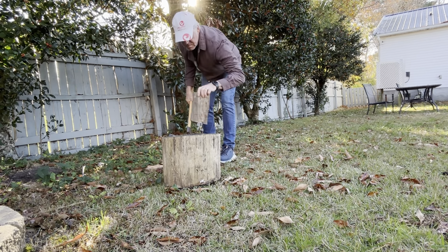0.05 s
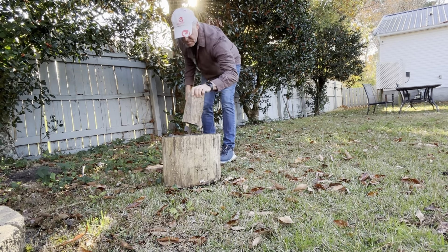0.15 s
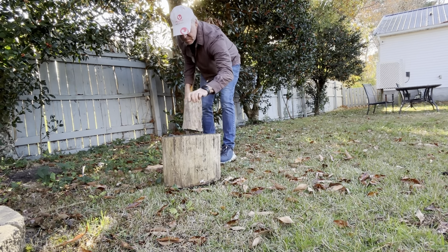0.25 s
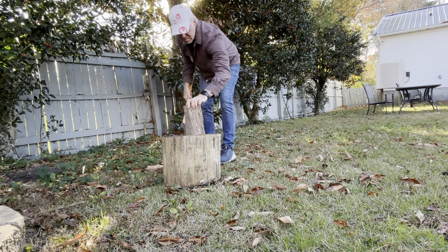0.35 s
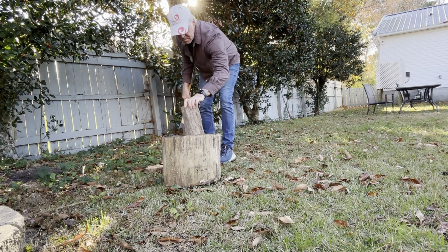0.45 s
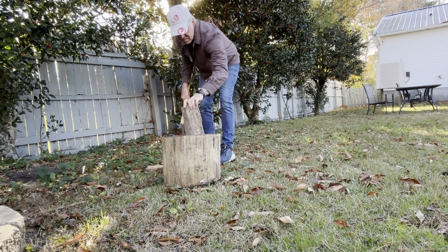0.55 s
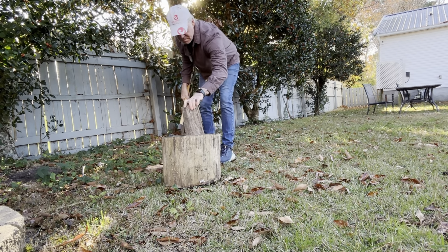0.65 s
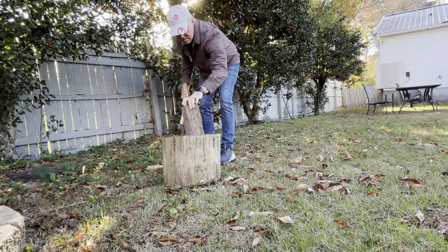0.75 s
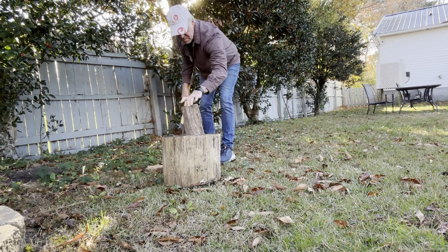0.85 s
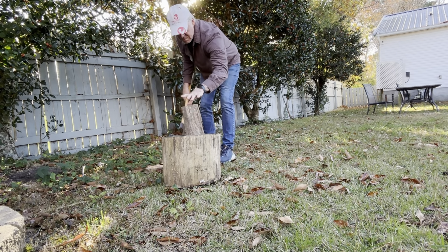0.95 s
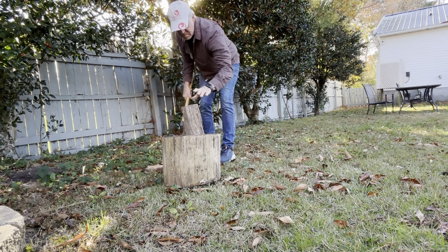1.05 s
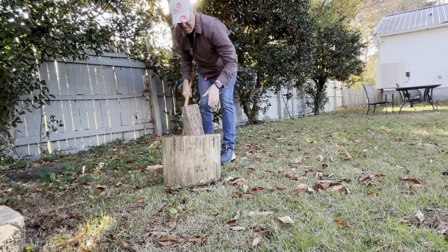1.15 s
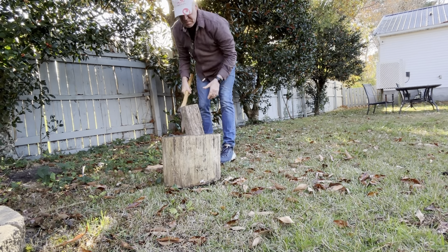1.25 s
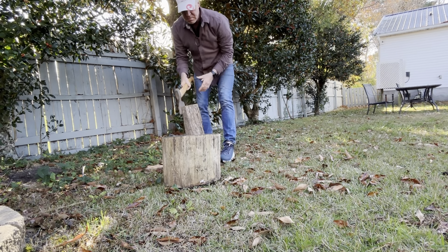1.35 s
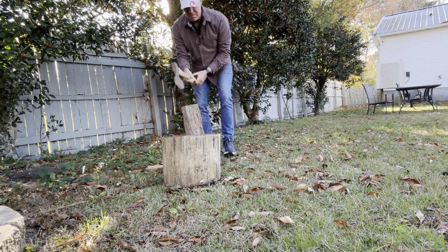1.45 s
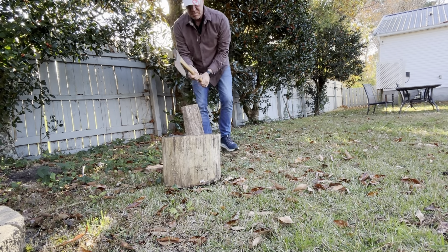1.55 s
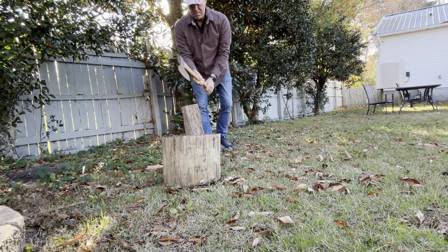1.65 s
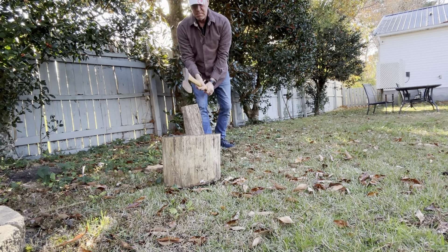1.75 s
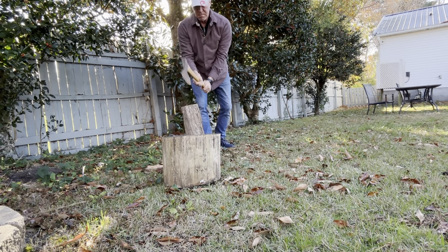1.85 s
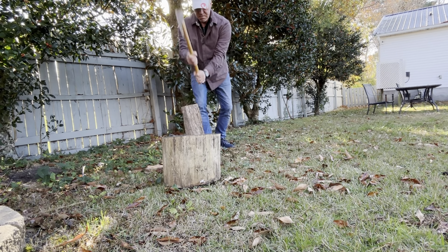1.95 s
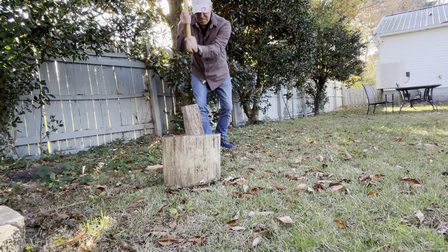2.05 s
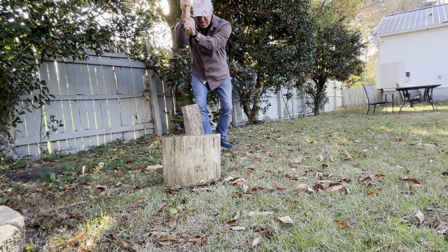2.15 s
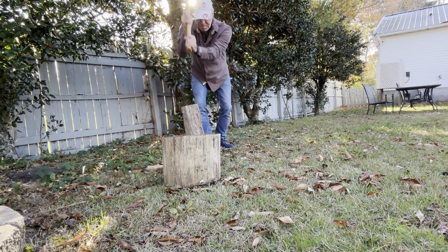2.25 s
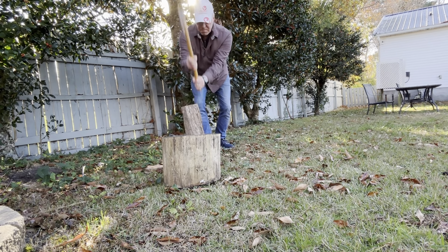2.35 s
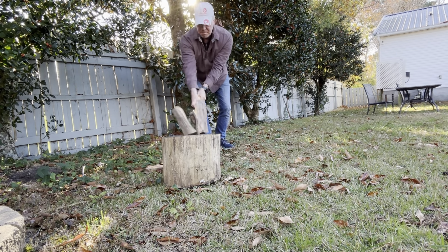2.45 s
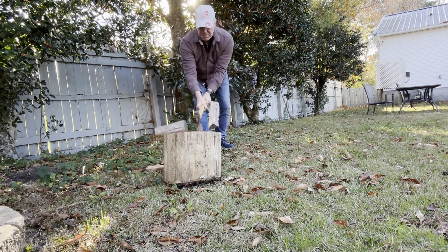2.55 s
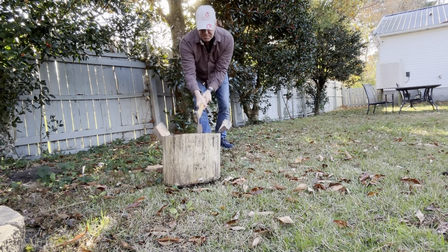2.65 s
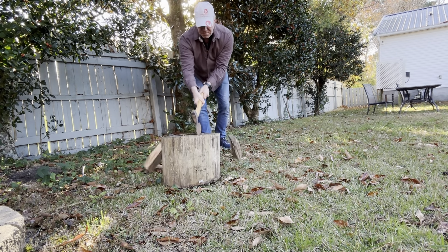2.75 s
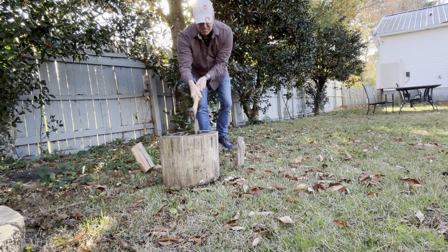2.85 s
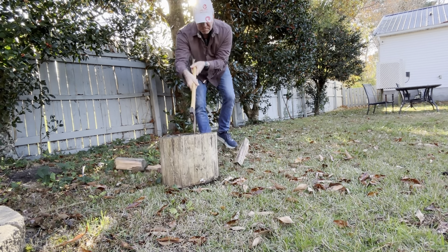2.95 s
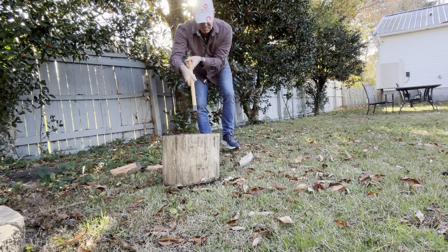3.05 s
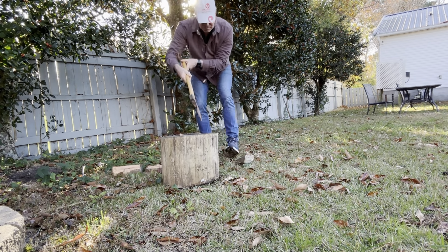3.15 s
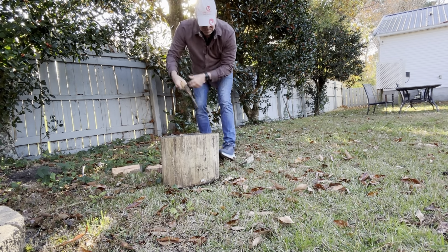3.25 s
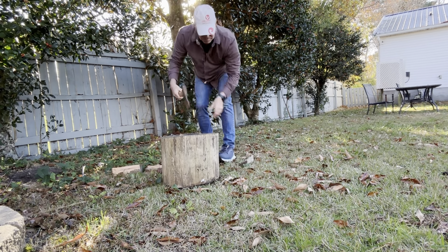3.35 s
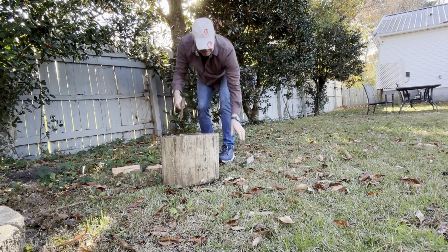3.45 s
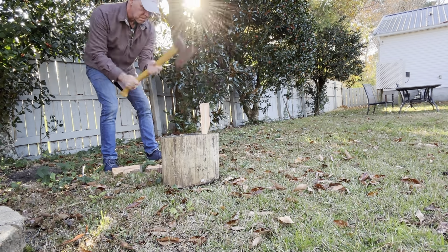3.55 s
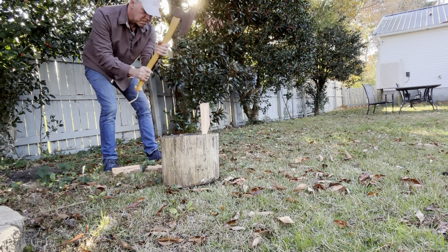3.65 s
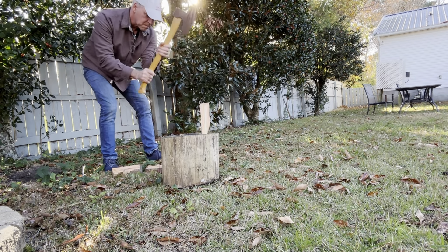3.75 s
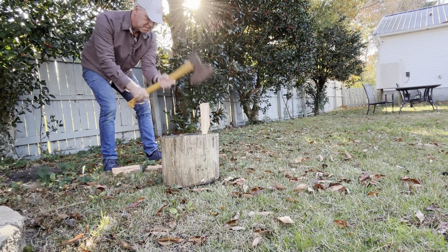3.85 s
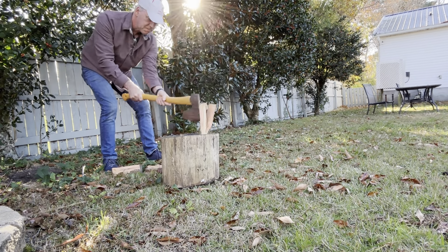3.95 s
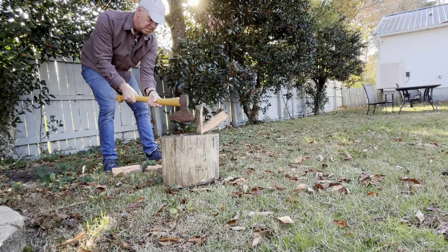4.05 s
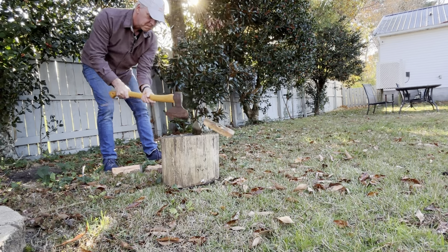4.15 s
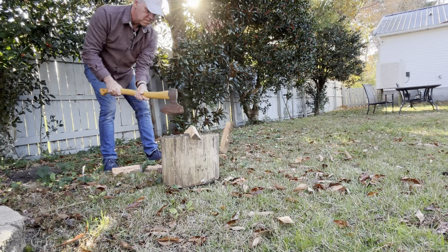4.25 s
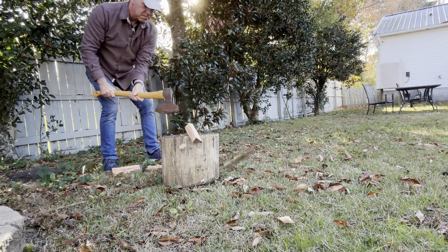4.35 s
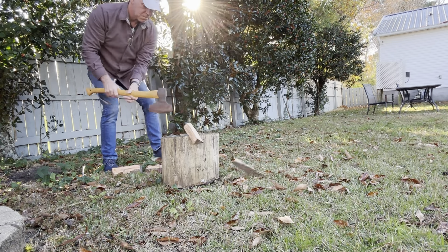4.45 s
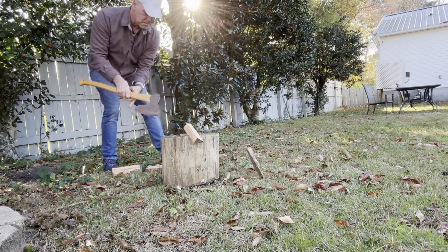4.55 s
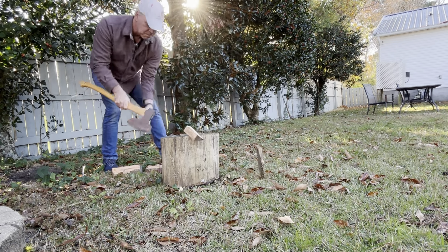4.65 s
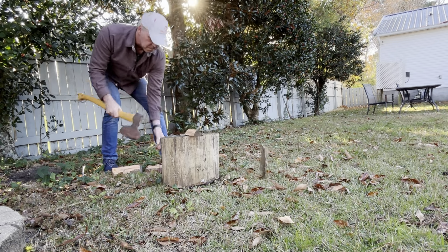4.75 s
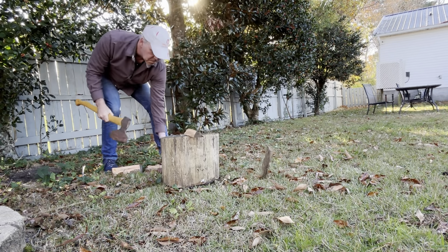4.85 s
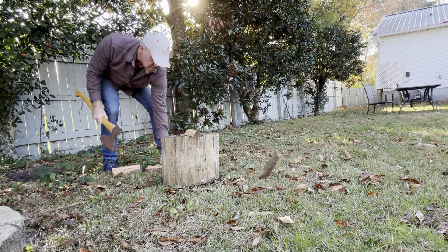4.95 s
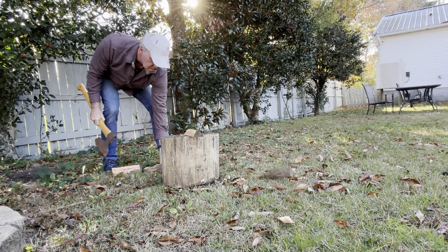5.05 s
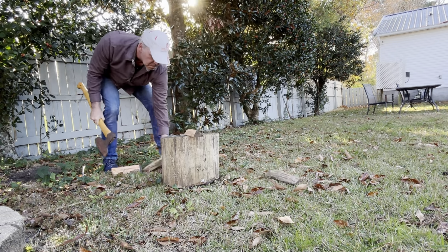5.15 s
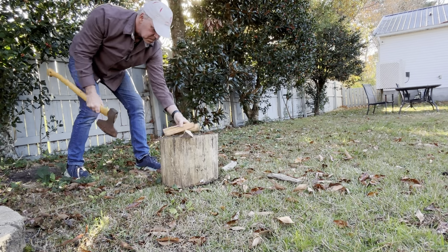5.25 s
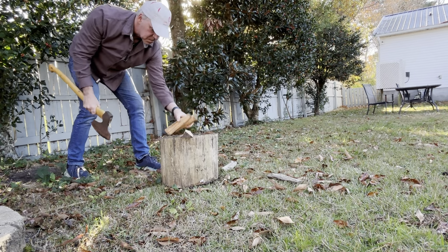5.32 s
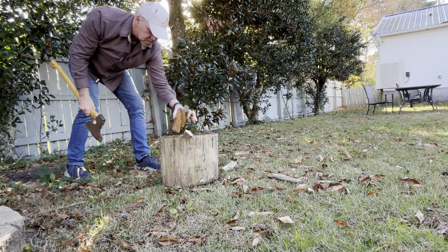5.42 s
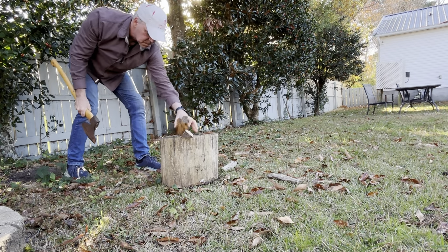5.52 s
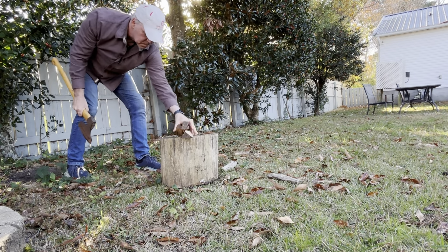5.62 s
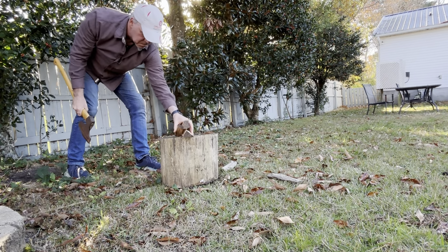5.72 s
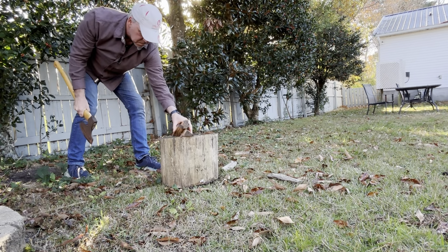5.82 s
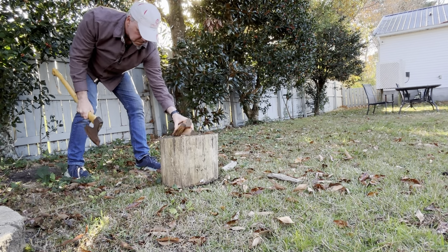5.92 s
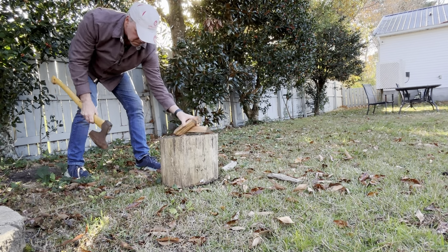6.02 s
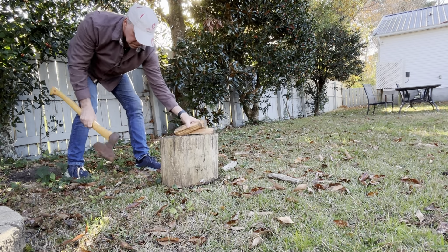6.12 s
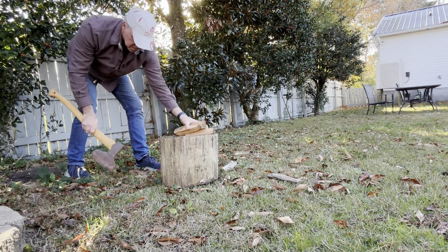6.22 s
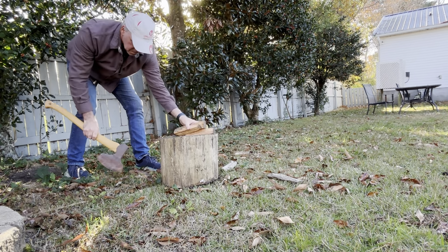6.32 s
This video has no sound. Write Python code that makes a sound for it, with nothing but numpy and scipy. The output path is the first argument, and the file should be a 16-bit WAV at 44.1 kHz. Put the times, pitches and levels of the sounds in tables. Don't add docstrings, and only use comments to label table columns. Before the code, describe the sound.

In a backyard, low traffic rumble, a distant engine and a steady hum lie under soft foot rustles in dry leaves. An axe splits a log with a loud crack and woody knocks, echoing off the fence; pieces drop into leaves. After a brief cut, a second sharp chop sends halves knocking and tumbling. Another cut leads to small, quiet wood knocks. Stereo small-camera microphone, blows fairly close.

```python
import sys
import numpy as np
from scipy import signal
from scipy.fft import rfft, irfft, next_fast_len
from scipy.io import wavfile
from scipy.ndimage import uniform_filter1d

SR = 44100
rng = np.random.default_rng(int(sys.argv[2]) if len(sys.argv) > 2 else 0)


def invert_db(level):
    return 10 ** (np.asarray(level, dtype=float) / 20)


def unload_audio(sound):
    columns = np.transpose(np.atleast_2d(sound))
    steps = np.round(np.clip(columns, -1, 1) * 32767)
    wavfile.write(sys.argv[1], SR, steps.astype(np.int16))


N = 281358


def read(points, hz, count=1):
    rows = np.transpose(points)
    return np.interp(np.log(hz + 1), np.log(rows[0] + 1), rows[count])


def evened(x):
    return x / np.sqrt(np.mean(x ** 2) + 1e-20)


def add(mix, s, sound):
    part = mix[..., round(s * SR):][..., :sound.shape[-1]]
    part += sound[..., :part.shape[-1]]


def coloured(x, gain_db):
    hz = np.fft.rfftfreq(x.shape[-1], 1 / SR)
    return irfft(rfft(x) * invert_db(gain_db(hz)), x.shape[-1])


def band_db(f, low_hz, high_hz, low_order, high_order):
    return -10 * np.log10((1 + (low_hz / (f + 1)) ** low_order) * (1 + (f / high_hz) ** high_order))


def envelope_db(t, s, hold, db, rise_db_s, fade_db_s):
    return db - rise_db_s * np.maximum(s - t, 0) - fade_db_s * np.maximum(t - s - hold, 0)


def field(level_db, size, patchy_db):
    frames, hz = 4 * N // size + 5, np.fft.rfftfreq(size, 1 / SR)
    t = np.arange(frames)[:, None] * size / 4 / SR
    re, im, patch = rng.standard_normal((3, 2, frames, len(hz)))
    patch = uniform_filter1d(patch[0], size=8, axis=0)
    patch = evened(uniform_filter1d(patch, size=8, axis=1))
    z = (re + 1j * im) * invert_db(level_db(t, hz) + patchy_db * patch)
    return signal.istft(z.transpose(0, 2, 1), nperseg=size, noverlap=3 * size // 4)[1][:, :N]


def burst(db, t60, gain_db, spiky_db=7.5):
    size = next_fast_len(int(np.clip(1.2 * t60 * SR, 1024, 8192)))
    t = np.arange(size) / SR
    spikes = invert_db(spiky_db * np.minimum(rng.exponential(1, 8192), 5))[:size]
    grit = coloured(rng.standard_normal((2, 8192))[:, :size] * spikes, gain_db)
    early = grit[:, :max(round(t60 * SR / 5), 64)]
    start = np.minimum(t / 0.00078, 1)
    end = np.minimum(3 * (1 - t / t[-1]), 1)
    return invert_db(db - 3 - 60 * t / t60) * start * end * grit / np.std(early)


def knock(out, s, db, first_hz, last_hz, t60, rattle_db, swings=0.76):
    t = np.arange(6000) / SR
    hz = last_hz + (first_hz - last_hz) * np.exp(-t / (.14 * t60))
    rise = (t / (t + swings / first_hz)) ** 2
    shape = rise * invert_db(-60 * (t / t60) ** 0.73)
    add(out[0], s, invert_db(db) * shape / shape.max() * np.sin(2 * np.pi * np.cumsum(hz) / SR))
    if rattle_db is not None:
        def around_pitch(f):
            return -9. * np.log2(f / first_hz + 0.014) ** 2
        add(out, s, burst(db + rattle_db, 1.35 * t60, around_pitch, spiky_db=2.0))


# start in seconds,
# peak in dB, t60 in seconds, tilt in dB per octave.
TEARS = [(2.4393, -3, 0.0052, 4.5), (2.44, -6, 0.0066, 4.5), (2.441, -20, 0.008, 4.5),
         (2.4435, -27, 0.014, 5), (2.4406, -20.5, 0.14, -2.5), (2.448, -42.5, .04, -10),
         (2.4562, -30, 0.059, 0), (2.475, -24, 0.015, -1), (2.46, -30, 0.26, -0.5), (2.492, -30, .03, -1.5),
         (2.5015, -31, 0.0076, 5), (2.519, -43, 0.065, -9), (2.549, -32, 0.017, -7.5),
         (2.575, -30.5, 0.037, -9), (3.8969, -21, 0.022, -1), (3.898, -10, 0.04, 5),
         (3.8996, -14, 0.039, 3.5), (3.9048, -19.5, .03, 0), (3.914, -28, 0.12, 3.5),
         (4.134, -38.5, 0.011, -14), (1.654, -49, 0.16, -3), (4.1962, -42, 0.019, 1.5),
         (5.523, -55, 0.021, 4), (5.532, -59, 0.059, 3), (5.557, -45, .015, 0), (5.566, -53, .05, -1.5),
         (5.927, -51, 0.06, 1), (6.245, -53, 0.02, 8)]
# frequency in Hz, density in dB per Hz.
TORN_WOOD = [(590, -23), (1000, -17.5), (1300, -8), (1640, -10.5), (2000, -10), (2590, -11), (3160, -14.5),
             (5810, -9.5), (6530, -11.5), (7090, -16), (8260, -16.5), (10300, -19), (12700, -25),
             (14700, -25), (16500, -42)]


def cracks():
    out = np.zeros((2, N))
    for s, db, t60, tilt_db in TEARS:
        add(out, s, burst(db, t60, lambda f: read(TORN_WOOD, f) + tilt_db * np.log2(f / 4000 + 0.0277)))
    return out


# start in seconds, peak in dB, first Hz, last Hz, t60 in seconds.
THICK_WOOD = [(2.4403, -9, 1280, 980, 0.0088), (2.4404, -5, 853, 294, 0.025),
              (2.4753, -11.5, 880, 400, 0.018), (2.478, -15.5, 330, 230, 0.022),
              (2.4838, -10.5, 320, 100.2, 0.038), (2.4907, -15, 104.5, 71, 0.031),
              (2.817, -28, 146, 112, 0.053), (3.899, -8.5, 880, 425, 0.014),
              (3.9046, -9.5, 498, 298, 0.023), (3.8995, -14.5, 820, 700, .02),
              (3.9035, -12, 420, 323, 0.035), (3.905, -22, 238, 174, 0.026), (4.136, -34, 570, 417, 0.023),
              (4.1956, -25, 595, 418, 0.019), (4.2045, -24.5, 332, 250, 0.007),
              (4.1166, -29, 550, 442, 0.018), (5.525, -37, 610, 296, 0.036),
              (5.553, -33.5, 304, 203, 0.026)]


def blows():
    out = np.zeros((2, N))
    for s, db, first_hz, last_hz, t60 in THICK_WOOD:
        knock(out, s, db, first_hz, last_hz, t60, rattle_db=-9)
    return out


# start in seconds, peak in dB, pitch in Hz, t60 in seconds.
SPLINTER_NOTES = [(2.4435, -29, 4250, .015), (2.454, -23, 5800, .02), (2.455, -24, 4000, .025),
                  (2.461, -26, 1934, 0.053), (2.463, -31, 2680, 0.035), (2.4405, -18.5, 2440, 0.011),
                  (2.441, -23.5, 3640, 0.017), (4.21, -52.5, 3580, 0.092), (2.4755, -32, 4310, 0.013),
                  (2.4755, -42, 1210, 0.02), (2.493, -36, 1990, .04), (2.497, -30, 4770, 0.094),
                  (2.522, -34, 1600, .025), (2.522, -35.5, 3670, 0.029), (2.539, -34, 1470, 0.026),
                  (2.559, -39, 1840, .04), (2.61, -48, 1810, 0.061), (2.635, -47, 3650, 0.057),
                  (2.44, -11, 5660, 0.009), (3.901, -16, 5220, .012), (3.9, -22.5, 2410, 0.01),
                  (3.907, -38, 4300, .03), (4.578, -47, 4600, .04), (3.903, -32, 1866, 0.014),
                  (3.9045, -24, 5900, 0.013), (3.905, -29, 3220, 0.029), (3.913, -28, 7250, 0.0296),
                  (3.918, -29, 5470, .015), (3.925, -36, 3250, .08), (3.951, -32, 2900, 0.0112),
                  (3.952, -42.5, 5000, .04), (3.939, -40.5, 1330, 0.017), (4.1155, -38, 1370, .03),
                  (4.1145, -32.5, 897, 0.011), (4.133, -47, 1390, .04), (4.2, -47, 1505, .06),
                  (4.4885, -46, 2480, 0.0086), (4.49, -45, 1210, 0.015), (5.5535, -46.5, 637, 0.021),
                  (5.564, -45, 980, 0.035), (5.563, -51, 1800, 0.031), (5.581, -40, 518, 0.023)]


def splinters():
    out = np.zeros((2, N))
    for s, db, hz, t60 in SPLINTER_NOTES:
        knock(out, s, db, hz, hz, t60, rattle_db=None)
    return out


# start in seconds, peak in dB, pitch in Hz, t60 in seconds.
STEEL_RINGS = [
    (3.8988, -12, 7060, 0.01),
    (3.8995, -11, 12900, 0.0048),
    (3.912, -39, 6000, .016),
    (4.4887, -42, 1870, 0.014),
    (5.5257, -50.5, 2280, 0.02),
    (5.531, -49, 2010, .018),
    (5.559, -52, 2380, 0.05),
    (5.924, -49, 1900, 0.087),
]


def rings():
    out = np.zeros((2, N))
    for s, db, hz, t60 in STEEL_RINGS:
        knock(out, s, db, hz, hz, t60, rattle_db=-6)
    return out


# start in
# seconds, peak in dB, lowest Hz, highest Hz.
SNAPS = [(1.41, -44, 4000, 7000), (1.7, -47, 4000, 7000), (1.602, -42, 4800, 6300), (1.61, -44, 4800, 6300),
         (1.662, -45, 2500, 7000), (1.685, -48, 1200, 3000), (2.4398, -10, 9000, 15500),
         (2.456, -27, 8000, 13950), (2.4915, -29, 1500, 6000), (2.502, -34, 3000, 9000),
         (2.7915, -42, 3000, 9000), (3.005, -40, 4000, 7000), (3.022, -42, 4000, 6500),
         (3.0735, -36, 4500, 9000), (3.8985, -10, 11000, 15500), (3.9045, -19, 10500, 15000),
         (3.951, -29, 2000, 9000), (3.956, -31, 2000, 8000), (4.0285, -41, 11000, 16000),
         (4.1158, -43, 10500, 16000), (4.1162, -49, 2500, 9500), (4.134, -49, 1200, 3300),
         (4.1966, -36, 2500, 6000), (4.2, -41, 9000, 15500), (4.2988, -43, 9000, 16000),
         (4.305, -45, 3000, 14000), (4.4105, -36, 4000, 9500), (4.415, -35, 5400, 8640),
         (4.4435, -43, 11500, 15500), (4.4886, -30, 1389, 5200), (4.4892, -41, 5500, 15000),
         (4.4915, -40, 1500, 5000), (4.501, -39, 6500, 15500), (4.5722, -29, 10700, 16400),
         (4.5745, -36, 11000, 16400), (5.5255, -42, 1800, 2900), (5.554, -41, 600, 2600),
         (5.566, -47, 3000, 4500), (5.926, -43, 3200, 4444), (6.12, -47, 3804, 5000)]


def ticks():
    out = np.zeros((2, N))
    for s, db, low_hz, high_hz in SNAPS:
        add(out, s, burst(db, .009, lambda f: band_db(f, low_hz, high_hz, 8, 8), spiky_db=0))
    return out


# start in seconds, peak in dB, first Hz, t60 in seconds.
LOOSE_PIECES = [
    (2.452, -24.5, 319, 0.13),
    (2.454, -32, 790, 0.061),
    (2.526, -41.5, 600, 0.062),
    (2.792, -47, 1010, 0.02),
    (4.122, -34.5, 468, 0.022),
    (4.21, -44, 700, 0.024),
    (4.2875, -35, 193, 0.027),
    (5.535, -36.5, 346, 0.019),
    (5.562, -45, 557, 0.03),
    (5.58, -50, 512, 0.019),
]


def clatters():
    out = np.zeros((2, N))
    for s, db, hz, t60 in LOOSE_PIECES:
        knock(out, s, db, hz, 0.72 * hz, t60, rattle_db=4)
    return out


# start in seconds, peak in dB, first Hz, t60 in seconds.
EDGE_TAPS = [
    (2.558, -35, 205, 0.084),
    (2.569, -33, 586, 0.017),
    (3.8995, -17, 1130, 0.02),
    (4.115, -36.5, 1910, 0.0091),
    (4.1153, -44.5, 1040, 0.009),
    (4.1966, -26.5, 1520, 0.014),
    (4.196, -23, 990, 0.0061),
    (5.572, -39, 514, 0.024),
    (5.92, -38.5, 356, 0.026),
]


def taps():
    out = np.zeros((2, N))
    for s, db, hz, t60 in EDGE_TAPS:
        knock(out, s, db, hz, .78 * hz, t60, rattle_db=-9.5)
    return out


# start in seconds, peak in dB, first Hz, last Hz, t60 in seconds.
HEAVY_ENDS = [
    (0.351, -36.5, 386, 297, 0.014),
    (2.573, -14, 313, 217, 0.023),
    (2.677, -31, 320, 255, 0.022),
    (2.801, -27.5, 517, 314, 0.021),
    (2.806, -33, 260, 200, 0.036),
    (4.2795, -31, 560, 456, 0.015),
]


def thuds():
    out = np.zeros((2, N))
    for s, db, first_hz, last_hz, t60 in HEAVY_ENDS:
        knock(out, s, db, first_hz, last_hz, t60, rattle_db=-15, swings=1)
    return out


def fence(struck):
    out = np.zeros((2, N))
    boards = rng.standard_normal(600) * np.exp(-np.arange(600) / (0.0051 * SR))
    smeared = signal.oaconvolve(struck, boards[None] / np.linalg.norm(boards), axes=1)[:, :N]
    echo = coloured(smeared, lambda f: band_db(f, 900, 9000, 4, 6) - f / 1200)
    add(out, .0525 - .0015, invert_db(-16) * echo)
    return out


# frequency in Hz, t60 in seconds.
YARD_T60 = [(200, 0.72), (600, 0.26), (1500, 0.79), (4000, 0.47), (8000, 0.48), (14000, 0.3)]
# frequency in Hz, gain in dB.
YARD_GAIN = [(200, -6.5), (600, -11.5), (1500, -7.5), (3000, 1.5), (4000, 3.5), (6000, -7), (9500, -3),
             (13000, -15.5), (16000, -14)]


def yard(x):
    hz, t, z = signal.stft(x, SR, nperseg=256, noverlap=192)
    power = uniform_filter1d(abs(z.T) ** 2, size=7, axis=1)
    keep = invert_db(-2 * 60 * 64 / SR / read(YARD_T60, hz))
    linger = np.array([signal.lfilter([1], [1, -k], p) for k, p in zip(keep, power.T)]).T
    late = np.pad(linger, ((8, 8), (0, 0)))
    slaps = uniform_filter1d(rng.exponential(1, (len(late), 1)) - 1, size=3, axis=0)
    slaps_db = .8 * evened(slaps)
    level_db = 10 * np.log10(late + 1e-20) + slaps_db + read(YARD_GAIN, hz) - 19.0
    return field(lambda t, hz: level_db[:len(t)], size=256, patchy_db=.8)


# start in seconds, peak in dB, centre in Hz, t60 in seconds.
CRUSHED = [(1.135, -68, 11800, 0.045), (1.434, -40, 12500, .015), (1.5258, -42, 6600, 0.014),
           (1.6, -52, 5500, 0.044), (1.661, -44, 6400, .03), (2.791, -41, 6350, 0.065),
           (3.0054, -35.5, 5330, 0.1), (3.02, -37, 12500, 0.022), (3.0727, -39.5, 6250, 0.072),
           (4.297, -47, 12500, .012), (4.41, -42.5, 6000, 0.05), (4.442, -53, 13100, 0.022),
           (4.487, -49, 4000, 0.024), (4.4885, -46, 6580, 0.013), (4.501, -41, 7200, 0.022),
           (4.754, -52, 13100, 0.011), (4.778, -57, 12300, .012), (5.194, -52, 5130, 0.043),
           (5.558, -49, 11900, 0.019), (5.662, -60, 11500, 0.013), (5.912, -50, 12400, 0.015),
           (6.151, -54, 12700, .012), (6.072, -53, 5000, 0.023), (6.183, -50, 4000, 0.023),
           (1.5262, -47, 12500, .01), (1.545, -52, 12000, .01), (1.601, -50, 12500, .02),
           (1.615, -52, 13000, .012), (1.435, -46, 6500, .012)]
# frequency in Hz, density in dB per Hz.
DRY_LEAF = [(1180, -36), (2000, -27), (2560, -17.5), (3340, -16), (4310, -12.5), (4710, -12.5),
            (5870, -9.5), (7130, -11), (10100, -11.5), (11300, -10.5), (12900, -8.5), (14500, -13),
            (15600, -19), (16100, -23.5), (16500, -46)]


def crunches():
    out = np.zeros((2, N))
    for s, db, hz, t60 in CRUSHED:
        add(out, s, burst(db, t60, lambda f: read(DRY_LEAF, f) - 42.0 * abs(np.log2(f / hz + 0.0083))))
    return out


# start in seconds, hold in seconds, level in dB, fade in dB per second,
# tilt in dB per octave.
FOOT_SWISHES = [(0, 0.31, -80.5, 148, -9), (.35, .03, -78.5, 47, -10), (1.14, .005, -72, 151, -8),
                (1.27, .005, -77, 150, -10), (1.36, 0.096, -56, 111, -2.5), (1.6, .05, -57, 300, -1),
                (1.66, 0.0085, -51, 299, -5), (1.7, .005, -66, 133, -7), (3.19, 0.026, -56, 100, 0),
                (3.36, 0.027, -68, 68, 6.8), (3.42, 0.034, -64, 164, -3), (3.62, 0.26, -78.5, 96.5, -10.5),
                (4.93, .03, -72.5, 98, -5.5), (5.0, 0.049, -62.5, 120, -3), (5.09, 0.03, -59.5, 148.5, 0),
                (5.15, 0.058, -70, 297, -5), (5.2, 0.063, -62.5, 900, 1), (5.66, .15, -73.5, 60, 0.5),
                (5.85, 0.053, -68, 86.5, -4.5), (6.09, 0.086, -67, 395, -6.5)]
WOOD_LANDINGS = [(2.79, 0.018, -43, 494, -2.5), (2.86, 0.29, -67, 200, -5.5),
                 (3.001, 0.029, -49.5, 700, -5.5), (3.03, 0.049, -59, 200, -4.5),
                 (3.072, 0.0081, -47, 900, -1), (3.09, .005, -60.5, 105, -4),
                 (4.117, 0.002, -65.5, 290, -10.5), (4.196, 0.0026, -59.5, 353, -9.5),
                 (4.22, 0.38, -72, 200, -8.5), (4.278, 0.028, -71, 400, -2), (4.399, .01, -59, 200, 2),
                 (4.412, 0.02, -53.5, 200, -0.5), (4.49, .004, -53.5, 85, -5), (4.575, 0.0024, -55, 268, 0),
                 (4.63, 0.005, -87, 45, 6), (5.559, .005, -66.5, 497.5, -8)]


def rustle():
    def level_db(t, hz):
        octaves = np.log2(hz / 11000 + 0.013)
        breeze_db = -84 - 12.5 * octaves
        power = invert_db(2 * breeze_db) + 0 * t
        for table, rise_db_s in [(FOOT_SWISHES, 502), (WOOD_LANDINGS, 3500)]:
            for s, hold, db, fade_db_s, tilt_db in table:
                moved = invert_db(2 * envelope_db(t, s, hold, db, rise_db_s, fade_db_s))
                power = power + moved * invert_db(2 * tilt_db * octaves)
        return read(DRY_LEAF, hz) - 6.0 + 10 * np.log10(power)
    out = field(level_db, size=256, patchy_db=-0.5)
    crackle = uniform_filter1d(np.minimum(rng.exponential(1, N), 5) ** 2 - 2, size=90)
    return out * invert_db(1.75 * evened(crackle))


# time in seconds, swell in dB.
TRAFFIC_SWELL = [(0, -0.3), (1.1, 0.55), (1.6, 2), (2.1, 1), (2.6, 2.5), (3.4, 0.7), (3.8, -1.2),
                 (5.15, 0.75), (5.45, 2.5), (6.15, 2), (6.38, 1)]
# frequency in Hz, density in dB per Hz.
OPEN_AIR = [(15, -31), (25, -8.5), (59, -0.5), (137, 4.5), (190, -9), (242, -7.5), (263, -17.5), (293, -15),
            (373, -25.5), (531, -23), (988, -21), (3430, -45.5), (5280, -45), (5900, -52.5), (9070, -58),
            (16000, -87)]


def traffic():
    def level_db(t, hz):
        low = 1 / (1 + (hz / 300) ** 4)
        swell_db = np.interp(t, *np.transpose(TRAFFIC_SWELL))
        rumble_db = -44 + 0.88 * swell_db - 9.5
        wash_db = -56.5 + swell_db + 12.0
        return read(OPEN_AIR, hz) + low * rumble_db + (1 - low) * wash_db
    return field(level_db, size=2048, patchy_db=.6)


# time in seconds, pitch in Hz, level in dB.
ENGINE_PASS = [
    (0, 73.4, -47.5),
    (.144, 73.8, -44),
    (.244, 66.9, -42),
    (.498, 66.2, -39),
    (.716, 64.1, -42.5),
    (1.034, 67.73, -45.5),
    (1.08, 64.1, -50),
]


def passing_engine():
    t = np.arange(N) / SR
    s, hz, db = np.transpose(ENGINE_PASS)
    return invert_db(np.interp(t, s, db) + 4.0) * np.sin(2 * np.pi * np.cumsum(np.interp(t, s, hz)) / SR)


# start in seconds, length in seconds, pitch in Hz, level in dB.
IDLE_SURGES = [
    (1.24, 0.34, 52.95, -41),
    (1.9, 0.38, 53.53, -40),
    (2.38, 0.05, 55.75, -45),
    (2.7, 0.8, 54.2, -46),
    (3.655, 0.017, 52.91, -44.5),
    (3.773, 0.82, 55.22, -44.5),
    (4.762, 0.38, 54.45, -47),
    (5.2, 0.71, 54, -47),
    (6.344, 0.047, 57.5, -61),
]


def idling_engine():
    t = np.arange(N) / SR
    s, length, hz, db = np.transpose(IDLE_SURGES)
    surges_db = np.max([envelope_db(t, *row, 252, 252) for row in zip(s, length, db)], axis=0)
    pitch = np.interp(t, s + length / 2, hz)
    return invert_db(np.maximum(surges_db, -52) + 3.0) * np.sin(2 * np.pi * np.cumsum(pitch) / SR)


# pitch in Hz, level in dB rms.
MACHINE_TONES = [(239.7, -48.5), (158.5, -74.5)]


def machine_hum():
    t, out = np.arange(N) / SR, np.zeros(N)
    for hz, db in MACHINE_TONES:
        waver_db = evened(coloured(rng.standard_normal(N), lambda f: -f * 3.9))
        out += invert_db(db + 2.5 + waver_db) * np.sin(2 * np.pi * hz * t)
    return out


def ports(two, table):
    hz, (a, b) = np.fft.rfftfreq(N, 1 / SR), rfft(two)
    same = np.clip(read(table, hz), 0, 1)
    lean = invert_db(read(table, hz, count=3) / 2)
    right = same * a * np.exp(-1j * read(table, hz, count=2)) + np.sqrt(1 - same ** 2) * b
    return irfft(np.array([a * lean, right / lean]), N)


# frequency in Hz, likeness from 0 to 1, right lag in radians,
# left minus right in dB.
PORTS_NEAR = [(60, .98, .05, -3), (400, .95, .5, -2.8), (1400, .75, 1.5, 0), (2800, .3, -.6, 7),
              (5000, .7, 2.2, 0.1), (7000, .7, 4.5, 6), (9800, .7, 3.1, .5), (11300, .95, .6, 1),
              (13000, .92, -.5, 1), (15000, .9, -1.1, 0)]
PORTS_FAR = [(60, .97, .27, -2.6), (240, .97, 1.2, -2.2), (700, .75, 2.7, 0.1), (1400, .45, 3.6, -3),
             (2500, .35, 5.6, -4), (7000, .3, 6.1, -4), (10000, .65, 9.2, -2.1), (11500, .93, 6.8, 0.1),
             (13000, .93, 6.1, 0.1), (15000, .8, 5.4, 0.1)]


def scene():
    struck = cracks() + blows() + splinters() + rings() + ticks() + clatters() + taps() + thuds()
    far = fence(struck) + invert_db(-2.0) * yard(struck[0]) + rustle() + crunches() + traffic()
    far[0] += passing_engine() + idling_engine() + machine_hum()
    return ports(struck, PORTS_NEAR) + ports(far, PORTS_FAR)


# time in seconds, fade length in seconds.
SCENE_CHANGES = [
    (3.585, 0.031),
    (5.283, 0.037),
]


def scene_fades():
    t = np.arange(N) / SR
    return np.prod([np.clip(abs(t - s) / length, .02, 1) for s, length in SCENE_CHANGES], axis=0)


def roll_off(x):
    return signal.sosfilt(signal.butter(12, 16830, fs=SR, output="sos"), x)


def record(dry):
    def ports_db(f):
        bass_cut = -10 * np.log10(1 + (42 / (f + 1)) ** 12)
        dip = -3.4 * np.exp(-((f - 10300) / 350) ** 2)
        top_edge = -10 * np.log10(1 + (f / 15700) ** 90)
        return bass_cut + dip + top_edge
    heard = coloured(0.8 * np.tanh(dry / 0.82), ports_db)
    return roll_off(heard * scene_fades())


dry = scene()
out = record(dry)
unload_audio(out)
```